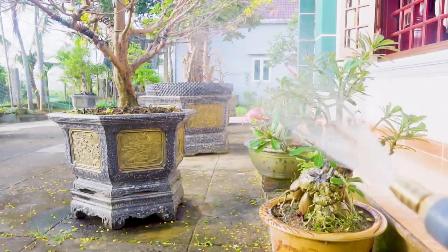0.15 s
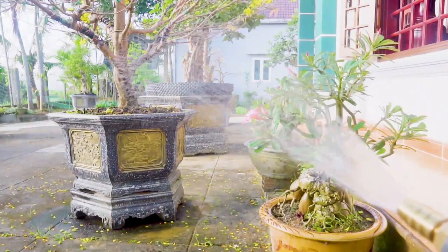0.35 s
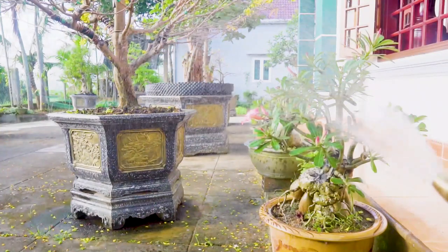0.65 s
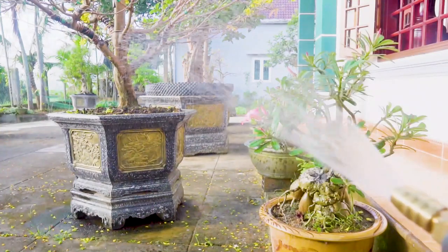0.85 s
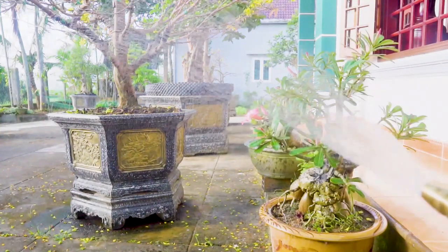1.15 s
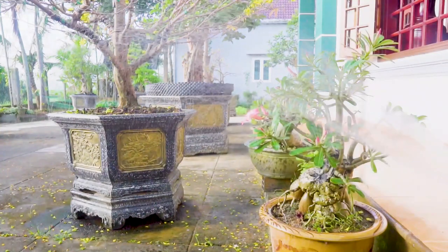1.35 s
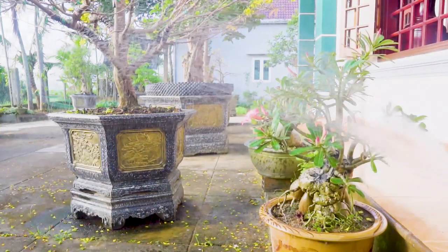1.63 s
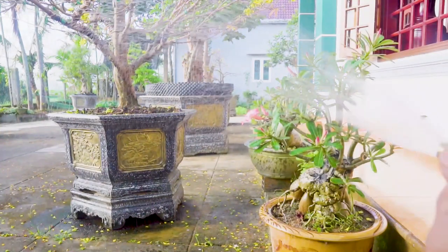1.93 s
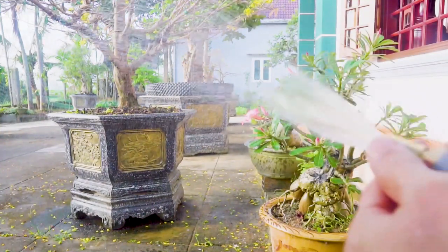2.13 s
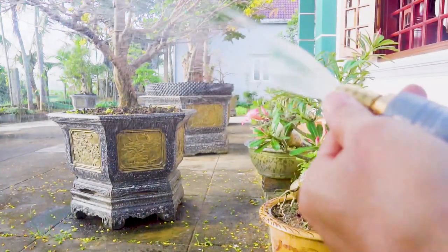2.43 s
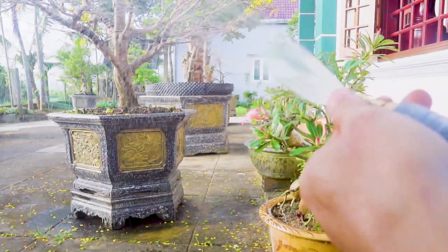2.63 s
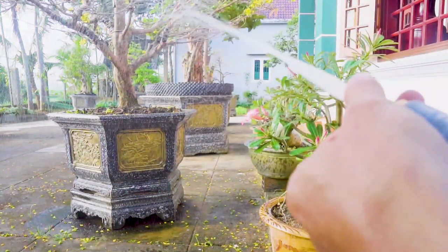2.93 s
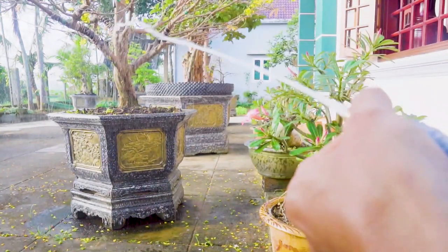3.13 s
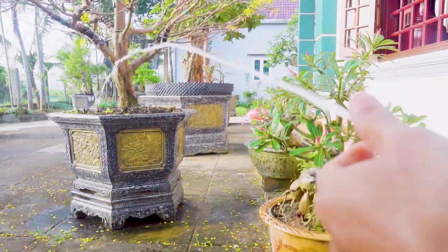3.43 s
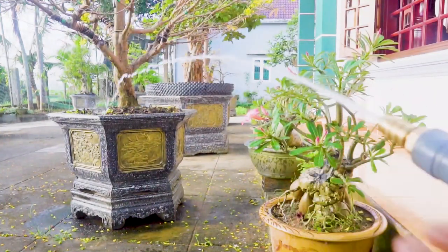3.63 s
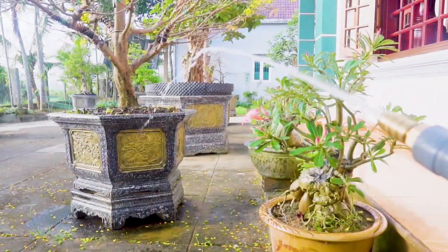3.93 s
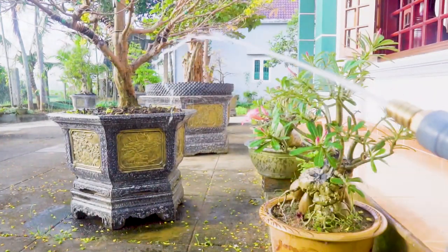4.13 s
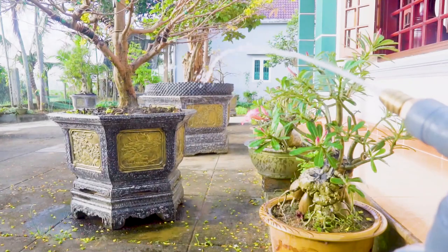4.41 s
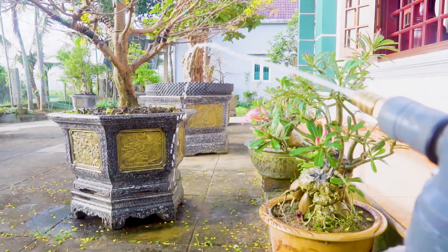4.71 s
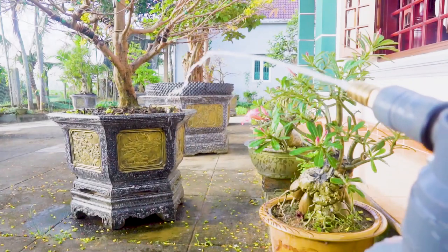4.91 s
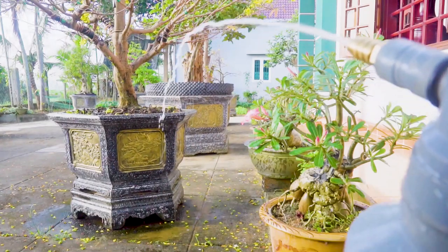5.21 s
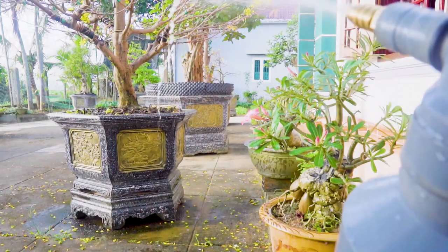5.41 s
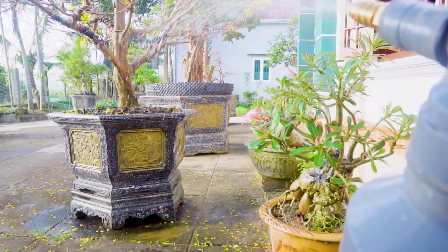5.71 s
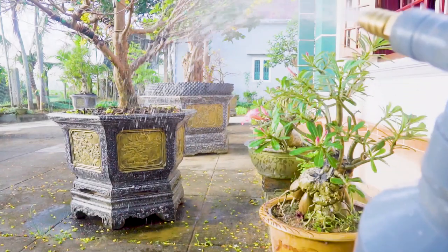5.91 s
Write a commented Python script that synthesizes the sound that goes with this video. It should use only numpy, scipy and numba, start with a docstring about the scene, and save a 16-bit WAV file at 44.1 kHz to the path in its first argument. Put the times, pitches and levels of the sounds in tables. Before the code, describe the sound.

Outdoors on a terrace, a water sprayer hisses steadily near the microphone, while a few drops tick and barely audible cockerels crow over a low distant rumble. The mist then narrows into a thin jet with an airy whistle that climbs in pitch. Short spits of air break in, and the flow swells to a loud, uneven, high hiss that is strongest at the end.

```python
"""Hand sprayer on a terrace

Close on the right, a sprayer tears water into a fine mist that hisses evenly. The nozzle is turned
to a thin jet and its chamber whistles breathily, then air enters the feed and it spits and roars.
A few drops tap on something hollow. Far cockerels and a low neighbourhood rumble lie behind."""
import sys
import numpy as np
from scipy import signal
from scipy.fft import rfft, irfft, next_fast_len
from scipy.io import wavfile
from scipy.ndimage import uniform_filter1d
from numba import njit

SR = 44100
rng = np.random.default_rng(int(sys.argv[2]) if len(sys.argv) > 2 else 0)


def store_pcm(level_fs):
    """Save levels as 16-bit WAV."""
    pcm = np.round(np.clip(level_fs, -1, 1) * 32767).astype(np.int16)
    wavfile.write(sys.argv[1], SR, np.atleast_2d(pcm).T)


N = 267246

# The cone of mist: time_s, level_db, pan_db (left minus right)
MIST_LEVEL = [(0, -39.5, -1), (1.34, -38.5, 0), (1.9, -40, -1.5), (2.63, -39.5, 1), (3.1, -43, 0),
              (3.2, -46, 0.5), (3.6, -44, 2), (4.2, -43.5, 1), (4.6, -51, 7)]
# Tone of the mist: frequency_hz, level_db
MIST_SPECTRUM = [(180, -47), (300, -17.5), (580, -8), (790, -6), (1070, -6.5), (1600, -6), (2500, -5.5),
                 (4500, -2.5), (6300, -7.5), (8500, -6.5), (10500, -12.5), (14000, -16.5), (16500, -16.5)]
# How alike left and right are in the mist: frequency_hz, likeness (0 to 1)
MIST_LIKENESS = [(300, 0.95), (700, 0.7), (1500, 0.61), (3000, 0.24), (5000, 0), (16000, 0.4)]

# Whistle of the nozzle's swirl chamber: time_s, level_db, pitch_hz
WHISTLE = [(2.3, -48, 4470), (2.94, -51, 4300), (3.0, -41, 4600), (3.1, -37, 4400), (3.19, -42, 4460),
           (3.45, -36.5, 4620), (3.6, -37.5, 5370), (3.72, -36, 5530), (3.89, -40, 5400), (3.98, -33, 5660),
           (4.24, -35.5, 5900), (4.255, -23, 5500), (4.285, -19.5, 5660), (4.3, -19, 8600),
           (4.485, -19.5, 8950), (4.505, -23.5, 6070), (4.57, -19, 7700), (4.61, -30, 5300),
           (4.65, -24, 5200), (4.7, -33, 5050), (4.75, -26.5, 5100), (4.79, -28.5, 5050), (4.83, -20, 6300),
           (4.92, -31.5, 5350), (4.95, -24, 5900), (5.02, -32.5, 5050), (5.11, -25, 5740),
           (5.18, -18.5, 7300), (5.36, -15.5, 8850), (5.43, -17, 10100), (5.56, -17, 10900),
           (5.62, -17, 9500), (6.06, -21, 8900)]
# The whistle is purest while the jet is thin and steady: time_s, sharpness (Q), overtone_db
WHISTLE_SHAPE = [(2.95, 2.7, -12), (3.05, 1.2, -13), (3.2, 4.4, -8), (3.5, 5.3, -22), (3.62, 2.6, -22),
                 (3.9, 3.5, -18), (4.05, 2.1, -11), (4.26, 2.2, -16), (4.32, 2.1, -17), (4.57, 2.7, -16),
                 (4.63, 2.6, -1), (4.84, 2.1, -8.5), (5.03, 3.7, -1.5), (5.2, 1.8, -15), (5.42, 2.03, -22),
                 (5.6, 1.1, -26), (6.06, .8, -27)]
# A thin sizzle slides up as the cone closes to a jet: time_s, level_db, centre_hz
SIZZLE_SWEEP = [(3.2, -70, 7300), (3.25, -52, 7900), (3.4, -52, 11000), (3.47, -50, 13200),
                (3.56, -70, 13400)]
# The flow's broad gush and high fizz: time_s, gush_db, fizz_db
FLOW_LEVELS = [(2.94, -49, -62), (3.02, -56, -44), (3.11, -44, -43), (3.18, -45.5, -54), (3.26, -57, -42),
               (3.53, -55, -40.5), (3.62, -46, -35.5), (3.89, -46.5, -38.5), (3.97, -47.5, -31.5),
               (4.165, -43.5, -32), (4.18, -33.5, -28.5), (4.24, -34.5, -30.5), (4.27, -26.5, -27.5),
               (4.6, -28, -28), (4.66, -33, -32.5), (4.76, -32, -31), (4.82, -26.5, -27.5),
               (4.92, -29.5, -30.5), (5.06, -30.5, -31), (5.13, -26.5, -24.5), (5.4, -27, -26.5),
               (5.48, -28.5, -20), (5.58, -24.5, -19.5), (6.06, -23, -18)]
# Tone of the gush: frequency_hz, level_db
GUSH_SPECTRUM = [(200, -52), (500, -17.5), (1060, -9), (1530, -3.5), (2480, -3.5), (3800, 2), (5500, 1),
                 (7500, -6.5), (11000, -12.5), (16000, -17)]
# Tone of the fizz: frequency_hz, level_db
FIZZ_SPECTRUM = [(3000, -35.5), (6500, -3.5), (9500, 1.5), (12000, 1), (14500, 0.5), (16500, -10)]
# How alike left and right are in the gush: frequency_hz, likeness (0 to 1)
GUSH_LIKENESS = [(300, 1), (1000, 0.98), (2000, 0.47), (6000, 0.76)]
# How alike they are in the jet's treble: time_s, likeness (0 to 1)
TREBLE_LIKENESS = [(3.0, 0.76), (4.2, 0), (4.4, 0.17), (5.099, 0.37), (5.3, 0.8)]
# Brief breaks in the flow: middle_s, length_s, dip_db
FLOW_BREAKS = [(5.52, .03, -2), (5.582, 0.03, -9), (5.838, 0.026, -2), (6.035, 0.02, -2.5)]
# Where the jet is heard: time_s, pan_db (left minus right)
JET_BALANCE = [(2.3, 2), (3.5, 0), (3.9, -0.5), (4.15, 2), (4.27, -3), (4.75, -2.5), (5.1, -1.7),
               (5.5, -0.5), (6.06, -0.5)]

# Air pockets bursting at the nozzle: start_s, level_db, centre_hz, width_octaves
AIR_POCKETS = [(.041, -39, 13500, .8), (.06, -35.5, 11500, 1.1), (.9844, -34.5, 13700, .7),
               (1.24, -44, 14500, .4), (1.985, -38, 13500, .6), (3.02, -41, 11000, .8),
               (3.045, -36.5, 10500, .6), (3.0594, -30, 6970, 0.73), (3.0744, -32, 9000, 1.1),
               (3.0994, -32, 6000, 1.5), (3.128, -33.5, 9500, 1.5), (3.185, -39, 10500, .65),
               (3.2086, -35, 11000, 0.88), (3.618, -22, 5500, 1.5), (3.6694, -32.5, 13000, .6),
               (3.9073, -28.5, 12500, .8), (3.9338, -24.5, 12000, 1.5), (3.992, -22.5, 8000, 2.1),
               (4.0422, -23, 5130, 1), (4.09, -24, 11900, 0.78), (4.1012, -19.5, 4860, 1.1),
               (4.135, -22.5, 11400, .9), (4.168, -25, 11000, 1.5), (4.2194, -27.5, 12500, .8),
               (4.257, -22.5, 5460, 1.1), (4.8323, -16, 7000, .9), (4.947, -18, 6500, 2)]
# Drops landing: start_s, level_db, pitch_hz, fade_s (time to fall by 60 dB)
DROP_HITS = [(0.1115, -19, 2100, 0.0048), (0.362, -21, 3000, .004), (0.6078, -25, 2000, .006),
             (3.692, -27.5, 2800, 0.0066), (3.7644, -30, 1500, 0.006), (4.184, -26.5, 2530, 0.011),
             (4.196, -30, 1100, 0.014)]
# Far crows: start_s, length_s, pitch_hz, glide_hz_per_s, level_db, overtone_db
COCKEREL_CALLS = [(0, .44, 757, -45, -61, -66), (.92, .4, 765, 150, -54, -55),
                  (2.52, .36, 783, 25, -61, -60), (2.4, .22, 1110, -30, -61, -72),
                  (2.97, .75, 1105, 40, -64, -74)]
# The rumble, fading as the spray grows: time_s, level_db
RUMBLE_LEVEL = [(0.0, -60), (0.95, -62.5), (1.89, -57), (2.1, -63.5), (4.93, -64.5), (5.5, -72), (5.9, -72)]
# Tone of the rumble: frequency_hz, level_db
RUMBLE_SPECTRUM = [(15, -60), (25, -30), (48, -8), (130, 4), (178, -3), (243, 4), (282, -3.5), (328, -4),
                   (400, -5), (520, -15), (880, -120)]
# Tone of the part that makes the rumble wide: frequency_hz, level_db
RUMBLE_SIDE_SPECTRUM = [(60, -43), (330, -7), (900, -25), (16000, -90)]

# Echoes off the hand, bottle, pots and wall: left_delay_ms, right_delay_ms, gain
NEAR_ECHOES = [(1.22, 0.54, -0.02), (1.55, 1.62, -0.039), (1.95, 1.9, -0.029), (2.45, 2.5, -0.00016),
               (2.85, 3.9, -0.036), (3.55, 3.35, 0.041), (4.6, 5.4, 0.077), (5.45, 5.1, 0.12),
               (7.7, 9.7, -0.16), (10.6, 11, 0.058)]
# The phone's body shades its left microphone: frequency_hz, left_db (the right gets the opposite)
PHONE_SHADE = [(200, 0), (600, -0.2), (1500, -2), (4000, -1.43), (9000, -0.9), (13000, 0.3)]
# So small a source sends out no deep bass: frequency_hz, gain_db
BASS_LOSS = [(60, -48), (210, -0.5)]

OVERTONE_RATIO, TIP_HZ = 1.92, 10250  # the overtone cannot pass the brass tip's own ring
GROWL_START_S, GROWL_RISE_S, GROWL_DB = 5.32, 0.61, -49


def jet():
    """Air and water rush through the swirl chamber and make it whistle; slugs of water make it flutter."""
    whistle_db, pitch_hz = curves(WHISTLE)
    sharpness, overtone_db = curves(WHISTLE_SHAPE)
    sizzle_db, sizzle_hz = curves(SIZZLE_SWEEP)
    gush_db, fizz_db = curves(FLOW_LEVELS)
    t = np.arange(N) / SR
    flutter_db = 0.56 * wander(70) + 0.8 * wander(250)
    for middle, length, dip_db in FLOW_BREAKS:
        flutter_db += dip_db * np.exp(-4 * np.log(2) * ((t - middle) / length) ** 2)
    # sloshing water keeps pulling the pitch down briefly; a steady jet holds it better
    slosh = 0.33 / np.maximum(sharpness, 1.8) ** 1.54
    whistle_hz = pitch_hz * np.exp(slosh * (.7 - np.abs(wander(130))))
    bursts = bubbles(350, spread_db=0.5)
    gush = stereo_by_band(turbulence(0.24 * bursts, lag_us=11), GUSH_LIKENESS)
    rush, hiss, fizz = (stereo_by_time(turbulence(0.31 * bursts, lag_us=14.5), TREBLE_LIKENESS)
                        for _ in range(3))
    overtone = band(hiss, np.minimum(OVERTONE_RATIO * pitch_hz, TIP_HZ), octaves=0.22)
    # a low growl swells in as the jet breaks into spray
    growl = np.clip((t - GROWL_START_S) / GROWL_RISE_S, 0, 1) * band(gush, 520, octaves=2.7)
    sound = (undb(whistle_db + 0.94 * wander(60)) * whistle(rush, whistle_hz, sharpness)
             + undb(whistle_db + overtone_db + 1.5 * wander(40)) * overtone
             + undb(fizz_db + 1.14 * wander(50)) * colour(fizz, FIZZ_SPECTRUM)
             + undb(gush_db) * colour(gush, GUSH_SPECTRUM)
             + undb(sizzle_db) * band(hiss, sizzle_hz, octaves=.12)
             + undb(GROWL_DB) * growl)
    fade_in = np.clip((t - WHISTLE[0][0]) / 0.09, 0, 1)
    return sound * pan(flutter_db, curves(JET_BALANCE)[0]) * fade_in


def whistle(rush, pitch_hz, sharpness):
    """The chamber picks one pitch out of the noise; a dip just above it gives a sharp upper edge."""
    ring = band(rush, pitch_hz, octaves=1.5 / sharpness)
    dip_hz, dip_octaves = np.minimum(1.5 * pitch_hz, .36 * SR), np.full(N, .35)
    return ring - 0.38 * np.array([band_pass(x, dip_hz, dip_octaves) for x in ring])


def mist():
    """A sheet of water tears into fine drops: an even hiss with stray ticks on top."""
    level_db, pan_db = curves(MIST_LEVEL)
    noise = turbulence(0.11 * bubbles(800, spread_db=15), lag_us=18)
    hiss = colour(stereo_by_band(noise, MIST_LIKENESS), MIST_SPECTRUM)
    kicks = (rng.random(N) < 25 / SR) * undb(4.4 * rng.standard_normal(N))  # about 25 a second
    ticks = band(add_tails(kicks, decay_s=.0015) * rng.standard_normal((2, N)), 13000, octaves=.6)
    waver_db = 0.18 * wander(6.36) + .5 * wander(39.6)
    return (hiss + undb(-9) * ticks) * pan(level_db + waver_db, pan_db)


def turbulence(bursts, lag_us):
    """Rushing noise swollen by bursts, three ways: direct, a moment later, and scattered."""
    direct, scattered = rng.standard_normal((2, N)) * (1 + bursts)
    late = shape(direct, delay(lag_us / 1000))
    return unit(direct), unit(late), unit(scattered)


def bubbles(per_s, spread_db):
    """Bubbles burst at random moments: tiny pulses, some stronger than the rest."""
    timing, strength = rng.random((2, N))
    size_db = np.minimum(-spread_db * np.log(strength + 1e-9), 2 * spread_db)
    return unit(add_tails((timing < per_s / SR) * undb(size_db), decay_s=0.00049))


def spits():
    """Each pocket of air leaves the nozzle as a short puff of noise."""
    out, t = np.zeros((2, N + SR)), np.arange(SR // 10) / SR
    for start, level_db, centre_hz, octaves in AIR_POCKETS:
        shared, left_only = rng.standard_normal((2, len(t)))
        noise = [.5 * shared + 1.38 * left_only, 1.01 * shared]
        puff = band(noise, centre_hz, octaves) * strike(t, rise_s=0.0006, fade_s=0.034)
        out[:, int(start * SR):int(start * SR) + len(t)] += undb(level_db) * puff
    return out[:, :N]


def drops():
    """Each drop makes something hollow ring briefly; a weaker echo comes off the paving."""
    out, t = np.zeros(N + SR), np.arange(SR // 20) / SR
    for start, level_db, pitch_hz, fade_s in DROP_HITS:
        ring = np.sin(2 * np.pi * pitch_hz * t) * strike(t, rise_s=0.0003, fade_s=fade_s)
        out[int(start * SR):int(start * SR) + len(t)] += undb(level_db) * ring
    echo = undb(-13) * np.roll(out, int(0.0067 * SR))
    return (out + echo)[:N] * pan(0, pan_db=-1.6)[:, None]


def cockerels():
    """Each crow swells and fades: a hoarse gliding note and its overtone, wavering on their way."""
    out, t = 0, np.arange(N) / SR
    for start, length, pitch_hz, glide, level_db, overtone_db in COCKEREL_CALLS:
        age = np.clip(t - start, 0, length)
        hoarse_hz = (pitch_hz + glide * age) * (1 + 0.0115 * wander(60))
        phase = 2 * np.pi * np.cumsum(hoarse_hz) / SR
        voice = undb(level_db) * np.sin(phase) + undb(overtone_db) * np.sin(2 * phase)
        swell = np.abs(np.sin(np.pi * age / length)) ** .6  # an arch with a flattened top
        out = out + np.sqrt(2) * swell * undb(2.2 * wander(35)) * voice
    return out


def rumble():
    """Low noise from the neighbourhood, swelling slowly and nearly the same left and right."""
    middle, side = rng.standard_normal((2, N))
    side = colour(side, RUMBLE_SIDE_SPECTRUM)
    low = colour(middle, RUMBLE_SPECTRUM) + undb(-13) * np.array([side, -side])
    return low * undb(curves(RUMBLE_LEVEL)[0] + 1.34 * wander(4.48))


def undb(db):
    """Turn decibels into a gain to multiply by."""
    return 10 ** (np.asarray(db) / 20)


def unit(x):
    """Scale x to an average (rms) level of 1."""
    return x / np.sqrt(np.mean(x ** 2))


def curves(table):
    """Turn each column after the time into a value for every sample."""
    times, *columns = np.transpose(table)
    return [np.interp(np.arange(N) / SR, times, column) for column in columns]


def wander(per_s):
    """A smooth random wobble of size about 1, with per_s new values a second."""
    hold = max(int(SR / per_s), 1)
    steps = np.repeat(rng.standard_normal(N // hold + 1), hold)
    return unit(uniform_filter1d(uniform_filter1d(steps, hold), hold)[:N])


def strike(t, rise_s, fade_s):
    """A level that rises quickly and falls by 60 dB in fade_s."""
    return np.minimum(t / rise_s, 1) * np.exp(-np.log(1000) * t / fade_s)


def add_tails(kicks, decay_s):
    """Give each kick a fading tail."""
    return signal.lfilter([1], [1, -np.exp(-1 / (decay_s * SR))], kicks)


@njit
def band_pass(x, hz, octaves):
    """Keep the sound near a moving pitch (a state-variable filter, gain 1 at the centre)."""
    out, band_state, low_state = np.empty(len(x)), 0., 0.
    for i in range(len(x)):
        angle = 2 * np.pi * hz[i] / SR
        step = np.tan(angle / 2)
        damping = octaves[i] * np.log(2) * angle / np.sin(angle)
        passed = (band_state + step * (x[i] - low_state)) / (1 + step * (step + damping))
        band_state = 2 * passed - band_state
        low_state += 2 * step * passed
        out[i] = damping * passed
    return out


def band(pair, hz, octaves):
    """Band-pass left and right twice for steep edges; white noise keeps roughly its level."""
    zeros = np.zeros(len(pair[0]))
    hz, octaves = np.clip(hz + zeros, 50, .36 * SR), np.clip(octaves + zeros, .05, 3)
    passed = np.array([band_pass(band_pass(x, hz, octaves), hz, octaves) for x in pair])
    return passed / np.sqrt(np.pi / 2 * np.log(2) * hz * octaves / SR)


def fft_size():
    """Samples used for a spectrum, with room for delays to run out."""
    return next_fast_len(N + SR // 20)


def over_hz(table):
    """Read a table of (frequency_hz, value) at every frequency of the spectrum."""
    hz, value = np.transpose(table)
    return np.interp(np.log(np.fft.rfftfreq(fft_size(), 1 / SR) + 1), np.log(hz), value)


def shape(x, gain):
    """Multiply the spectrum of x by gain."""
    return irfft(rfft(x, fft_size()) * gain, fft_size())[..., :N]


def colour(x, spectrum):
    """Give noise the tone in a table, at an average level of 1."""
    return unit(shape(x, undb(over_hz(spectrum))))


def delay(ms):
    """The gain that makes shape() delay a sound."""
    return np.exp(-2j * np.pi * np.fft.rfftfreq(fft_size(), 1 / SR) * ms / 1000)


def pan(level_db, pan_db):
    """Left and right gains; a positive pan_db favours the left."""
    return undb(level_db + np.array([pan_db, -pan_db]) / 2)


def stereo_by_band(noises, likeness):
    """The right hears the direct noise; the left blends late and scattered noise by frequency."""
    direct, late, scattered = noises
    alike = np.clip(over_hz(likeness), 0, 1)
    return np.array([shape(late, alike) + shape(scattered, np.sqrt(1 - alike ** 2)), direct])


def stereo_by_time(noises, likeness):
    """Like stereo_by_band, but the blend changes over time."""
    direct, late, scattered = noises
    alike = np.clip(curves(likeness)[0], 0, 1)
    return np.array([alike * late + np.sqrt(1 - alike ** 2) * scattered, direct])


def scene():
    """The close sprayer and its echoes, in front of the far sounds."""
    shade = undb(over_hz(PHONE_SHADE))
    echoes = 1 + sum(gain * np.array([delay(left), delay(right)]) for left, right, gain in NEAR_ECHOES)
    path = np.array([shade, 1 / shade]) * echoes * undb(over_hz(BASS_LOSS))
    sprayer = shape(mist() + jet() + spits() + drops(), path)
    return sprayer + cockerels() + rumble()


def record(dry):
    """The sharpest spray pops are gently rounded so they do not clip, and the highest treble is cut."""
    excess = np.maximum(np.abs(dry) - .5, 0)
    peaks = np.sign(dry) * (excess - .22 * np.tanh(excess / .22))
    treble_peaks = signal.sosfilt(signal.butter(2, 900, "high", fs=SR, output="sos"), peaks)
    top_cut = signal.ellip(10, .2, 60, 15850, fs=SR, output="sos")
    return signal.sosfilt(top_cut, dry - treble_peaks)


dry = scene()
out = record(dry)
store_pcm(out)
```